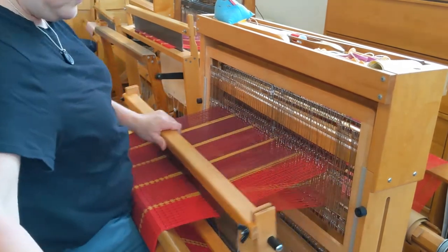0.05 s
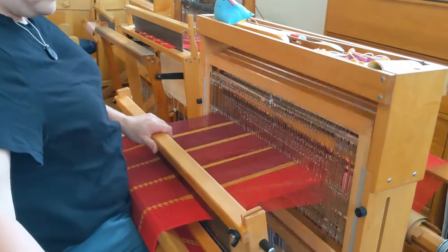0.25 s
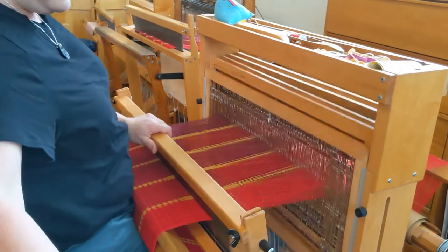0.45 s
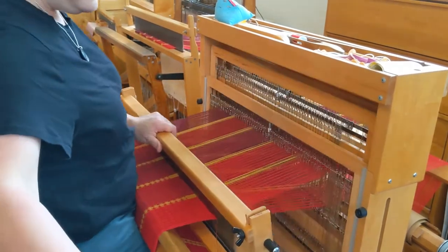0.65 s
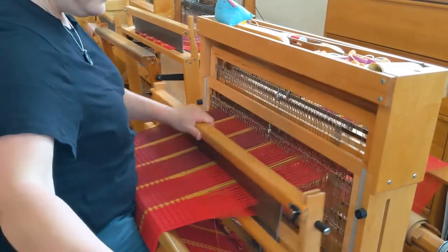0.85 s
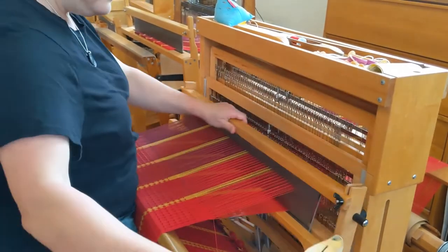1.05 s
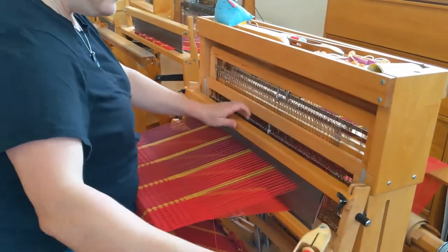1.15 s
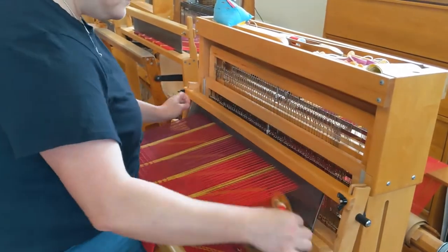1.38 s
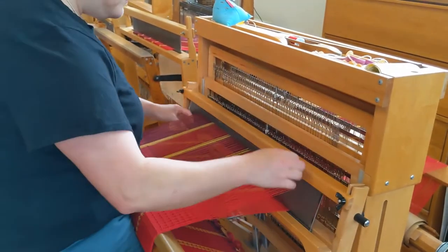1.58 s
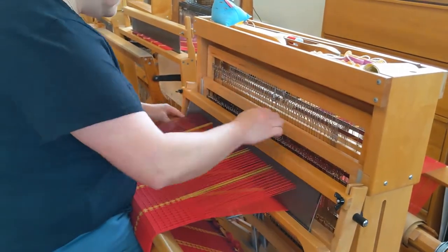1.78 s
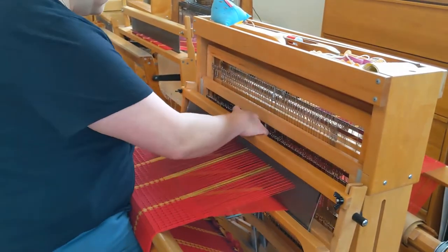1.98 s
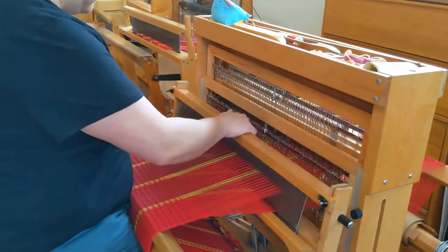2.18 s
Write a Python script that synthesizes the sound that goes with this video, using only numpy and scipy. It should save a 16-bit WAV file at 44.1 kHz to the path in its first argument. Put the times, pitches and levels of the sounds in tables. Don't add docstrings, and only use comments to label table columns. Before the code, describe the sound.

A wooden floor loom clacks and knocks, its metal heddles jingling as a loose shuttle rattles past.

```python
import sys
import numpy as np
from scipy import signal
from scipy.fft import rfft, irfft
from scipy.io import wavfile
from scipy.ndimage import uniform_filter1d

SR = 44100
rng = np.random.default_rng(int(sys.argv[2]) if len(sys.argv) > 2 else 0)


def convert_level_to_amplitude(level_db):
    exponent = np.asarray(level_db, float) / 20
    return 10 ** exponent


def transcribe(u):
    v = np.clip(np.atleast_2d(u).T, -1, 1)
    q = np.round(v * 32767).astype(np.int16)
    wavfile.write(sys.argv[1], SR, q)


N = 97020

# (frequency [Hz], density [dB per Hz])
AIR_COLOUR = [(30, 7.5), (55, -1), (140, -16.5), (600, -18), (2500, -20), (4300, -9.5), (6500, -23),
              (10500, -19), (15500, -39)]
# (frequency [Hz], T60 [s])
STUDIO_DECAY = [(60, 0.51), (300, 0.52), (1000, 0.62), (3000, 0.76), (6000, 0.56), (12000, 0.093)]
# (time [s], level [dB])
RUB_LEVEL = [(0.0, -65.5), (0.16, -60.5), (0.24, -40), (0.37, -39.5), (0.59, -51), (0.72, -55), (0.91, -55),
             (0.99, -61.5), (1.19, -64), (1.3, -46.5), (1.44, -54.5), (1.74, -46.5), (2.02, -56.5),
             (2.2, -82)]
# (frequency [Hz], density [dB per Hz])
FRAME_COLOUR = [(18, -43), (30, -3), (57, 2), (86, -17), (345, 1.5), (601, -3.5), (1570, -4.5), (2160, -8),
                (2500, -1.5), (3250, -15.5), (5500, -120)]
# (start [s], length [s], pitch [Hz], level [dB])
SQUEAKS = [(0.422, 0.03, 1726, -36.5), (0.474, .014, 2260, -44), (0.498, 0.044, 2567, -38),
           (0.535, 0.032, 2520, -30.5), (0.578, 0.022, 1787, -38.5), (1.128, 0.023, 4480, -55),
           (1.525, 0.037, 1670, -39.5), (1.574, 0.048, 1622, -42), (1.63, 0.022, 1650, -48),
           (1.67, 0.025, 1617, -29.5), (1.714, 0.091, 1622, -43), (1.835, 0.11, 1627, -48.5),
           (1.69, .03, 5400, -41), (1.231, 0.014, 2790, -38), (1.818, 0.033, 2507, -31.5)]
# (time [s], level [dB])
SHAKE_LEVEL = [(0.15, -62), (0.188, -66.5), (0.204, -40), (0.42, -54.5), (0.488, -41), (0.538, -43),
               (0.592, -47), (0.65, -41.5), (0.668, -29.5), (1.024, -77.5), (1.134, -89), (1.14, -60.5),
               (1.18, -70), (1.208, -48.5), (1.346, -53), (1.445, -79)]
# (frequency [Hz], density [dB per Hz])
HEDDLE_COLOUR = [(710, 1.5), (1200, -10.5), (1760, -11), (2540, -2.5), (3350, -2.5), (4770, 1), (5370, -6),
                 (11200, -6.5), (15500, -17.5)]
# (time [s], peak [dB], floor thump [dB], crack [dB], brightness [dB per octave])
WOOD_KNOCKS = [(0.196, -26.5, -16, -3, -13), (0.523, -28.5, -23, 5.5, -2), (0.618, -28, -16, -20, 20),
               (0.654, -12, -35, -26, 4.5), (0.662, -20.5, -16, 2, -2), (0.674, -27, -11, 9.5, -3),
               (1.199, -26.5, -10.5, -28, -3), (1.207, -25.5, -33, -13, 6), (1.2112, -18, -19, -19, -3),
               (1.23, -30, -28, -17, 8), (1.246, -31, -28, -23, -7), (1.266, -31, -28, -13, -13),
               (1.453, -21, -33, -12.5, 8.5), (1.464, -37, -43, -18, 9.5), (1.478, -32.5, -26, -17, 9),
               (1.675, -20.5, -26, -17, -6), (1.792, -30.5, -23, -20, -2), (1.851, -27.5, -32, -10, 2)]
# (frequency [Hz], level [dB], T60 [s])
RAIL_MODES = [(367, -11, 0.031), (507, -14, 0.042), (784, -17, 0.028), (810, -29, 0.013),
              (905, -0.5, 0.035), (990, 2.5, 0.033), (1160, 3.5, 0.017), (1375, 2, 0.013),
              (1570, 4.5, 0.0088), (1853, 2, 0.018), (2060, -4, 0.016), (2360, -2.5, 0.019),
              (2770, -25, 0.016), (3200, -38, 0.013)]
# (frequency [Hz], level [dB], T60 [s])
BOARD_MODES = [(55.2, -6, 0.35), (93, -14, 0.11), (119, -9, 0.19)]
# (time [s], level [dB])
BRUSH_FIRST = [(0, -56), (.1, -62), (.2, -58)]
BRUSH_NEXT = [(1.45, -70), (1.452, -51.5), (1.666, -53), (1.682, -40.5), (1.764, -50), (1.86, -37),
              (2.034, -57), (2.096, -49), (2.2, -44)]
# (frequency [Hz], density [dB per Hz])
WARP_COLOUR = [(760, -15.5), (1300, -18), (1640, -10), (1780, -18), (2560, -4), (2920, 0), (3230, -2),
               (8830, -7), (12000, -7.5), (15600, -54), (22000, -120)]
# (time [s], level [dB])
SCUFF_FIRST = [(0, -45.5), (.035, -52), (.06, -50), (.11, -53)]
SCUFF_NEXT = [(2.049, -73), (2.053, -37.5), (2.136, -46.5), (2.16, -66), (2.188, -44), (2.2, -55)]
# (frequency [Hz], level [dB], T60 [s])
HULL_MODES = [(1570, -2, 0.018), (1654, 1.5, 0.017), (1850, -0.5, 0.011), (2030, -2, 0.0083),
              (2300, -3.5, 0.011)]
# (time [s], peak [dB])
STEEL_TICKS = [(0.0314, -38.5), (0.1276, -39), (1.4548, -38), (1.5473, -34), (1.5808, -34), (1.6408, -30),
               (1.68, -21), (1.697, -29), (1.7076, -34), (1.7614, -29), (1.797, -29), (1.8047, -31.5),
               (1.8307, -28), (1.8618, -25.5), (1.989, -34), (2.085, -28), (2.1321, -33), (2.1494, -35),
               (2.175, -27.5)]
# (frequency [Hz], level [dB], T60 [s])
PIN_MODES = [(4800, -7, 0.024), (5430, 0.5, 0.033), (5650, 3.5, .025), (6000, -3, 0.022),
             (6460, -2.5, 0.021), (7930, -3, 0.016), (8800, 6, 0.017), (9470, -2, 0.018), (10450, -7, .015),
             (10700, -16, 0.014)]
# (time [s], level [dB])
SPIN_FIRST = [(0, -45), (.035, -46), (.055, -42), (.07, -42), (.11, -55), (.16, -72), (.2, -60)]
SPIN_NEXT = [(1.453, -45), (1.52, -48), (1.6, -39.5), (1.665, -39), (1.7, -31), (1.79, -47), (1.85, -40.5),
             (1.95, -39.5), (2.045, -44), (2.055, -41.5), (2.2, -40.5)]
# (time [s], peak [dB])
BOBBIN_TICKS = [(0.002, -25.5), (0.0229, -29.5), (0.029, -32), (0.0372, -34), (0.048, -34), (0.0587, -25),
                (0.0629, -28.5), (0.073, -34), (0.089, -31.5), (0.097, -32), (0.1304, -22.5), (0.1365, -24),
                (.142, -32), (1.4532, -22), (1.5726, -31), (1.586, -27), (1.6402, -31), (1.6679, -25),
                (1.6747, -30), (1.6817, -23), (1.6907, -19.5), (1.698, -37), (1.708, -53), (1.8315, -24),
                (1.863, -35), (2.0142, -30.5), (2.0541, -36), (2.083, -32), (2.092, -28), (2.129, -29),
                (2.149, -33), (2.175, -41)]
# (frequency [Hz], level [dB], T60 [s])
BOBBIN_MODES = [(1630, -35.5, 0.011), (1730, -24, 0.017), (2065, -13, 0.027), (2330, -7.5, 0.056),
                (2548, 2, 0.029), (2765, 3, 0.02), (2992, -3, 0.049), (3110, -11.5, 0.067),
                (3977, -7.5, 0.04), (4570, -14.5, 0.06), (5400, -8, 0.027), (5870, -12.5, 0.022),
                (6210, -10.5, 0.04), (8900, -19, .004)]

WOOD_ROOM_DB, METAL_ROOM_DB, SPOOL_ROOM_DB = -5.5, -8.5, -7
RATTLES_PER_S, SPOOL_LOW_HZ = 3000, 1400


def rms_one(x):
    return x / np.sqrt(np.mean(x ** 2) + 1e-20)


def in_time(rows):
    s, db = np.transpose(rows)
    return convert_level_to_amplitude(np.interp(np.arange(N) / SR, s, db, -120, -120))


def at_hz(points, hz):
    table = np.array(points)
    return np.interp(np.log(hz), np.log(table[:, 0]), table[:, 1])


def butter(x, order, hz, kind="low"):
    return signal.sosfilt(signal.butter(order, hz, kind, fs=SR, output="sos"), x)


def colour(x, spectrum):
    hz = np.arange(N // 2 + 1) * SR / N + 1
    return rms_one(irfft(rfft(x) * convert_level_to_amplitude(at_hz(spectrum, hz)), N))


def ring(clicks, hz, t60):
    r = convert_level_to_amplitude(-60 / (t60 * SR))
    w = 2 * np.pi * hz / SR
    return signal.lfilter([0, np.sin(w)], [1, -2 * r * np.cos(w), r * r], clicks + 1e-18)


def ring_modes(clicks, modes):
    out = 0
    for k, (hz, level_db, t60) in enumerate(modes):
        out = out + convert_level_to_amplitude(level_db) * ring(clicks, hz, t60) * (-1) ** k
    return out


def blows_at(s, gain):
    blows = np.zeros(N)
    blows[(s * SR).astype(int)] = gain
    return blows


def dying(blows, seconds):
    keep = np.exp(-1 / (seconds * SR))
    return signal.lfilter([1], [1, -keep], blows + 1e-18), keep


def grains(rate, spread_db):
    sizes = convert_level_to_amplitude(spread_db * np.minimum(rng.exponential(1, (2, N)), 4))
    sizes = sizes * rng.choice([-1, 1], (2, N))
    return sizes * (rng.random((2, N)) < rate / SR)


def pair(common, apart):
    side = convert_level_to_amplitude(-.5) * butter(apart, 3, 950, "high") + convert_level_to_amplitude(-17) * apart
    return common + side * [[1], [-1]]


def strike(s, db, modes, contact_s, tilt=0, touch=.12):
    out, rough = np.zeros((2, N)), pair(*rng.standard_normal((2, N)))
    for hz, level_db, t60 in modes:
        uneven_db = 2 * rng.standard_normal(len(s))
        blows = blows_at(s, convert_level_to_amplitude(db + level_db + tilt * np.log2(hz / 1000) + uneven_db))
        contact, keep = dying(blows, contact_s)
        contact = contact * np.sqrt(1 - keep ** 2)
        out += ring(contact * rough + touch * blows, hz, t60)
    return out


def jingle(rate, cycles, spectrum):
    clicks, dealt = grains(rate, spread_db=2.5), rng.integers(0, 40, (2, N))
    rings = 0
    for k, hz in enumerate(np.geomspace(1150, 16000, 40)):
        rings = rings + ring(clicks * (dealt == k), hz, cycles / hz) * hz ** .5
    return pair(*colour(rings, spectrum))


def air():
    return convert_level_to_amplitude(-54) * pair(*colour(rng.standard_normal((2, N)), AIR_COLOUR))


def studio(x):
    t, tail = np.arange(SR) / SR, 0
    for low in 30 * 2 ** np.arange(0, 9.1, .5):
        band = butter(rng.standard_normal((2, SR)), 2, [low, low * 2 ** .5], "band")
        tail = tail + band * convert_level_to_amplitude(-60 * t / at_hz(STUDIO_DECAY, low * 1.19))
    tail = rfft(tail * np.clip((t - .003) / 0.0078, 0, 1))
    usual = uniform_filter1d(np.abs(tail), size=150)
    tail = tail / np.maximum(np.abs(tail), usual) * np.minimum(1, usual / np.median(usual))
    tail = pair(*(irfft(tail, SR) * (t < .8)))
    tail = tail / np.sqrt(np.sum(tail[0] ** 2))
    return signal.fftconvolve(x.mean(axis=0)[None], tail, axes=1)[:, :N]


def frame():
    return pair(*colour(grains(2500, spread_db=1.0), FRAME_COLOUR)) * in_time(RUB_LEVEL) * convert_level_to_amplitude(0.5)


def squeaks():
    out, t = np.zeros((2, N)), np.arange(N) / SR
    for s, length, hz, db in SQUEAKS:
        swell = np.sin(np.pi * np.clip((t - s) / length, 0, 1))
        tone = ring(ring(rng.standard_normal((2, N)), hz, .04), hz, .04)
        tone = tone[0] + .6 * tone[1] * np.array([[1], [-1]])
        tone = swell * tone / uniform_filter1d(np.abs(tone[0] + tone[1]), size=700) ** .8
        out += convert_level_to_amplitude(db) * rms_one(tone) * np.sqrt(length * SR / N / 2)
    return out


def warp():
    soft = butter(jingle(9000, 30, WARP_COLOUR), 9, 10600)
    return soft * (in_time(BRUSH_FIRST) + in_time(BRUSH_NEXT)) * convert_level_to_amplitude(7)


def heddles():
    return jingle(14000, 35, HEDDLE_COLOUR) * in_time(SHAKE_LEVEL) * convert_level_to_amplitude(9.5)


def knocks():
    s, db, thump, crack, tilt = np.transpose(WOOD_KNOCKS)
    rails = butter(strike(s, db - 13.5, RAIL_MODES, 0.017, tilt), 2, 220, "high")
    boards = butter(strike(s, db + thump + 5, BOARD_MODES, 0.017), 2, 170)
    snap = dying(blows_at(s, convert_level_to_amplitude(db + crack)), 0.014)[0] * rng.standard_normal((2, N))
    return rails + boards + butter(snap, 2, [1500, 11000], "band")


def pin():
    s, db = np.transpose(STEEL_TICKS)
    chatter = rms_one(ring_modes(grains(1500, spread_db=3.0), PIN_MODES))
    both = chatter * in_time(SPIN_NEXT) * convert_level_to_amplitude(-13) + strike(s, db - 8.5, PIN_MODES, 0.0076)
    return butter(both, 5, [4000, 12000], "band")


def hull():
    scuff = ring_modes(grains(RATTLES_PER_S, spread_db=2.5), HULL_MODES)
    scuff = butter(scuff, 5, SPOOL_LOW_HZ, "high")
    return rms_one(scuff) * (in_time(SCUFF_FIRST) + in_time(SCUFF_NEXT))


def bobbin():
    knots = N // 250 + 2
    lumps = np.interp(np.arange(N) / 250, np.arange(knots), rng.standard_normal(knots))
    clicks = grains(RATTLES_PER_S, spread_db=2.5) * convert_level_to_amplitude(3 * lumps)
    rattle = rms_one(ring_modes(clicks, BOBBIN_MODES))
    rattle = rattle * (in_time(SPIN_FIRST) + in_time(SPIN_NEXT)) * convert_level_to_amplitude(3.5)
    s, db = np.transpose(BOBBIN_TICKS)
    both = rattle + strike(s, db - 9.0, BOBBIN_MODES, 0.003, touch=.5)
    top = signal.sosfiltfilt(signal.butter(3, 3400, "high", fs=SR, output="sos"), both)
    both = both - top * (1 - convert_level_to_amplitude(-15)) * (np.arange(N) < SR)
    return butter(both, 5, [SPOOL_LOW_HZ, 10500], "band")


def scene():
    wood = knocks() + frame() + squeaks()
    metal = heddles() + warp()
    spool = bobbin() + pin() + hull()
    wet = studio(convert_level_to_amplitude(WOOD_ROOM_DB) * wood + convert_level_to_amplitude(METAL_ROOM_DB) * metal + convert_level_to_amplitude(SPOOL_ROOM_DB) * spool)
    return wood + metal + spool + wet + air()


def top_cut(x):
    return signal.sosfilt(signal.butter(12, 16650, fs=SR, output="sos"), x)


def record(dry):
    dull_band = signal.butter(3, [6580, 13400], "band", fs=SR, output="sos")
    dip = signal.sosfiltfilt(dull_band, dry[1])
    right = convert_level_to_amplitude(.9) * (dry[1] - (1 - convert_level_to_amplitude(-14.5)) * dip)
    both = butter(np.array([dry[0], right]), 3, 44, "high")
    both = signal.sosfilt(signal.ellip(12, .5, 85, 15900, fs=SR, output="sos"), both)
    return top_cut(both)


dry = scene()
out = record(dry)
transcribe(out)
```